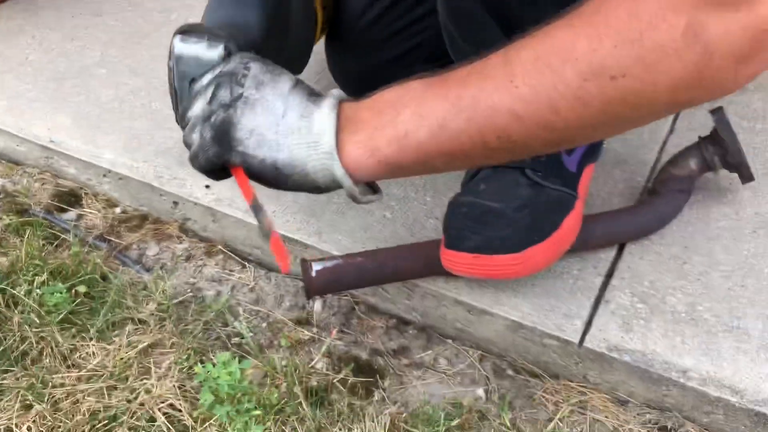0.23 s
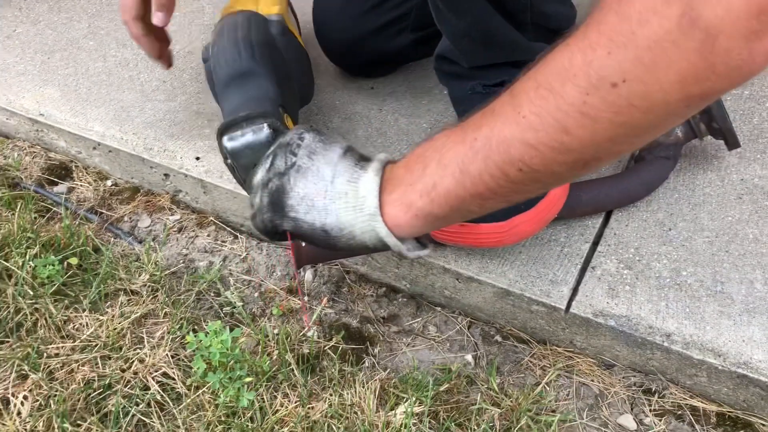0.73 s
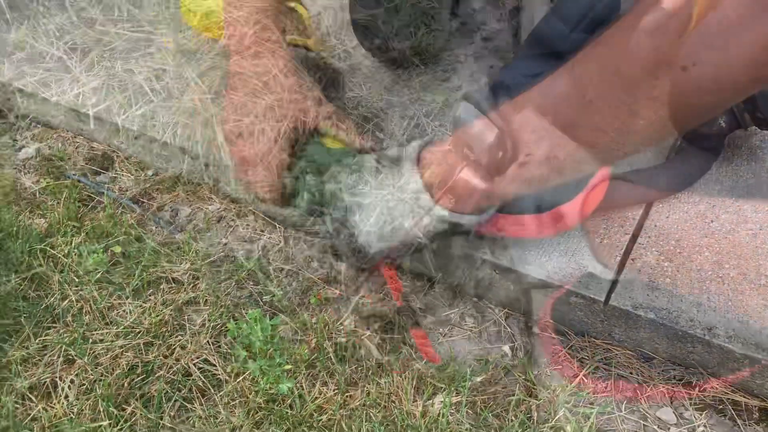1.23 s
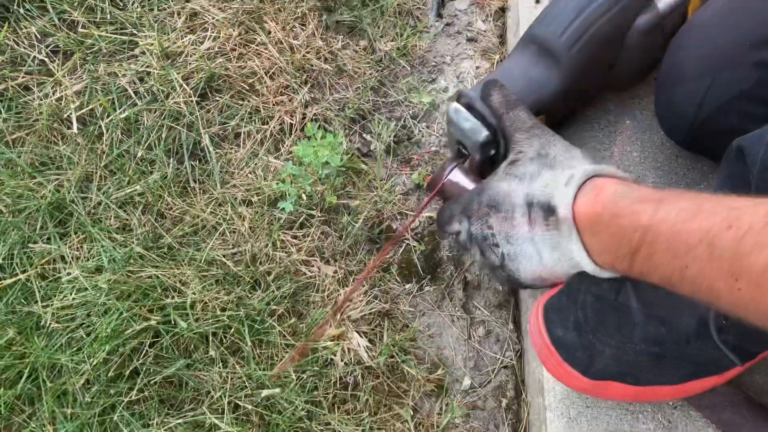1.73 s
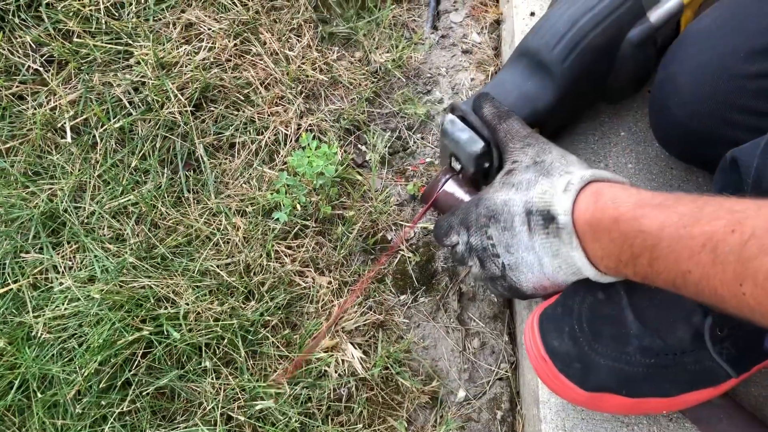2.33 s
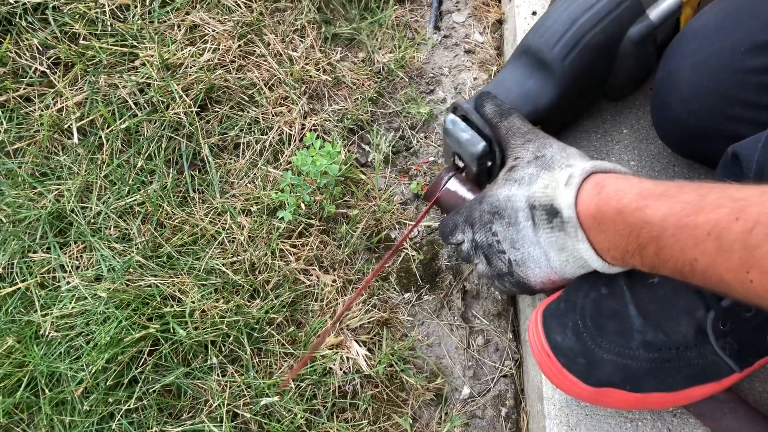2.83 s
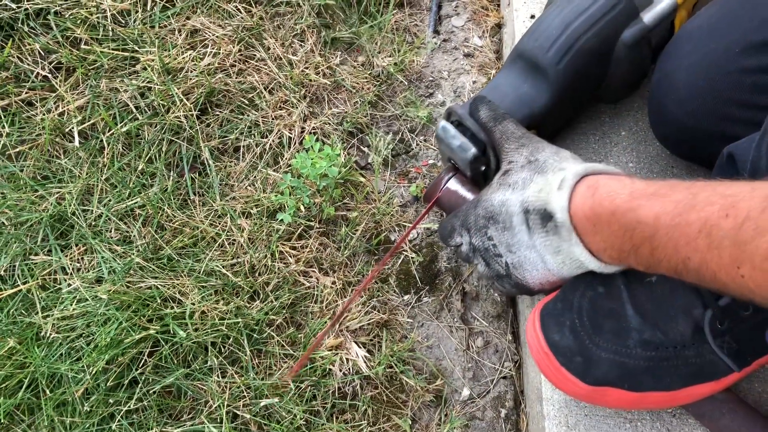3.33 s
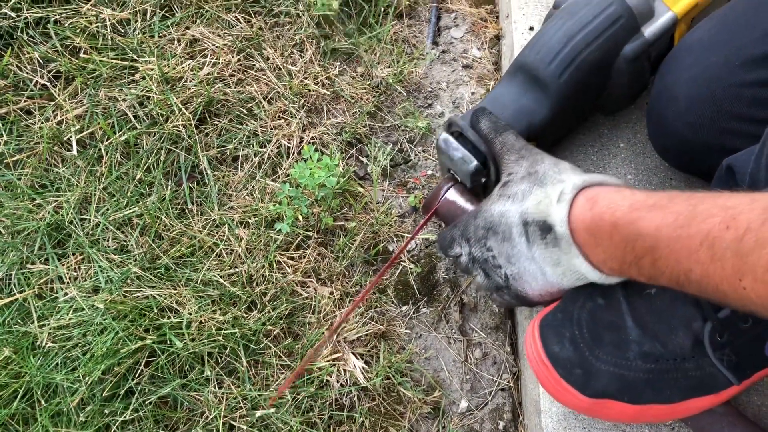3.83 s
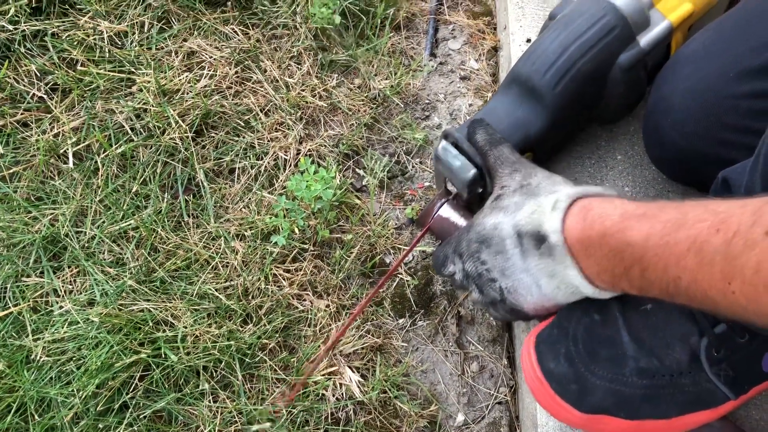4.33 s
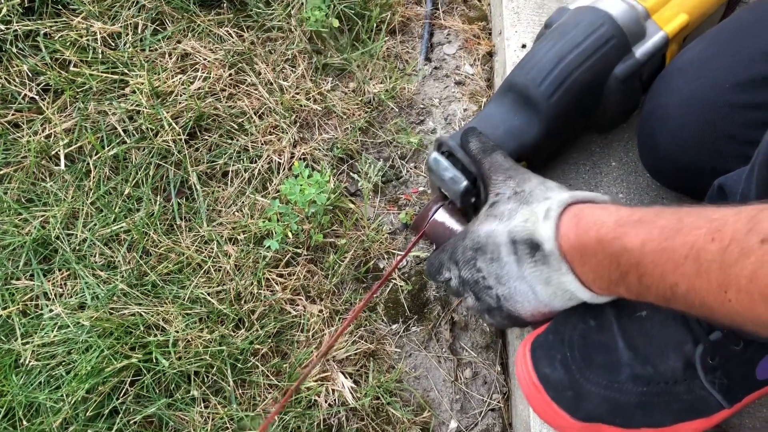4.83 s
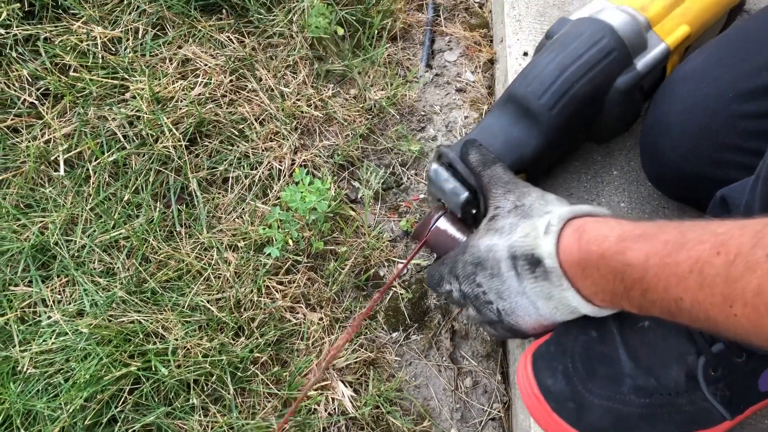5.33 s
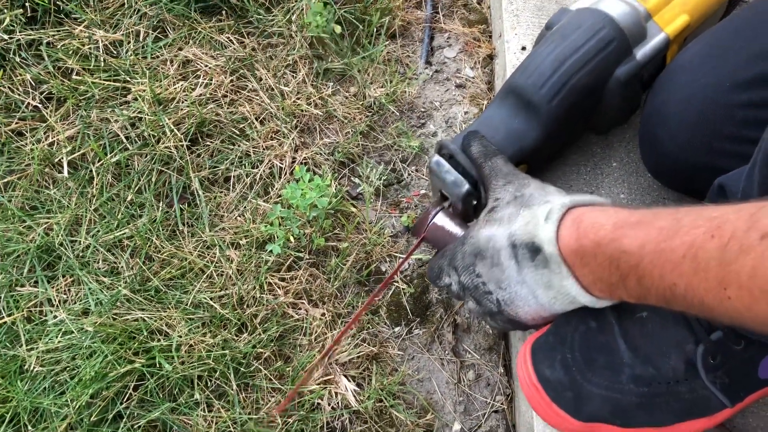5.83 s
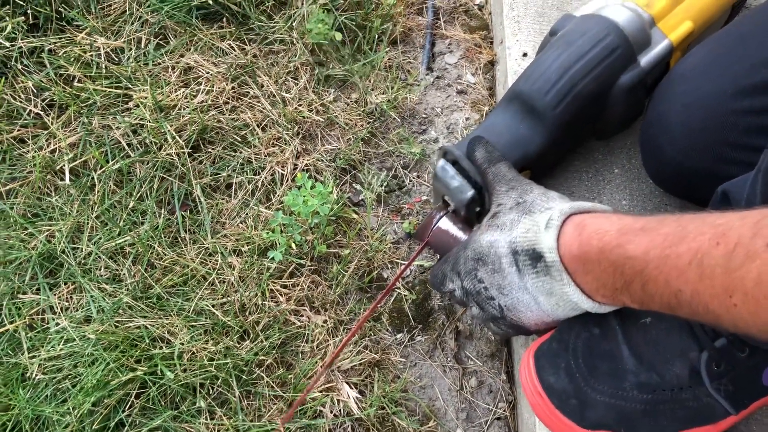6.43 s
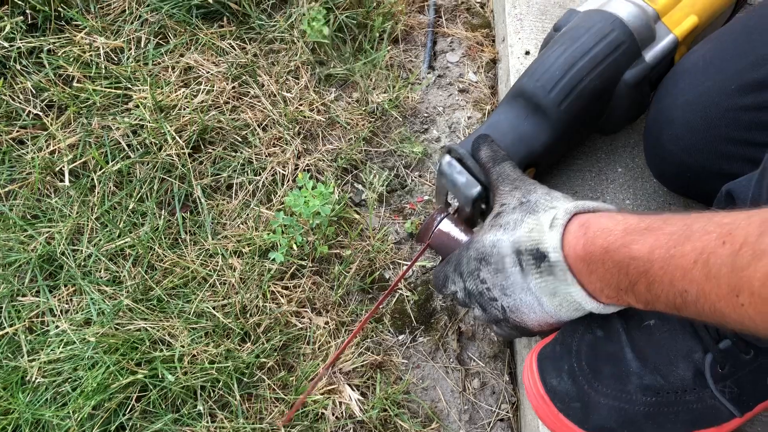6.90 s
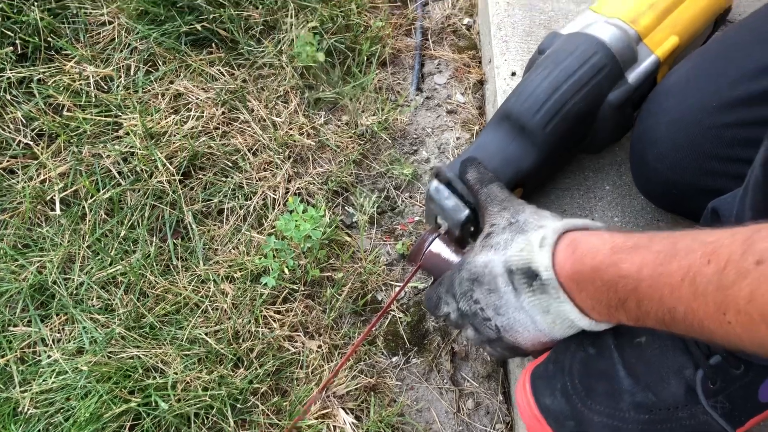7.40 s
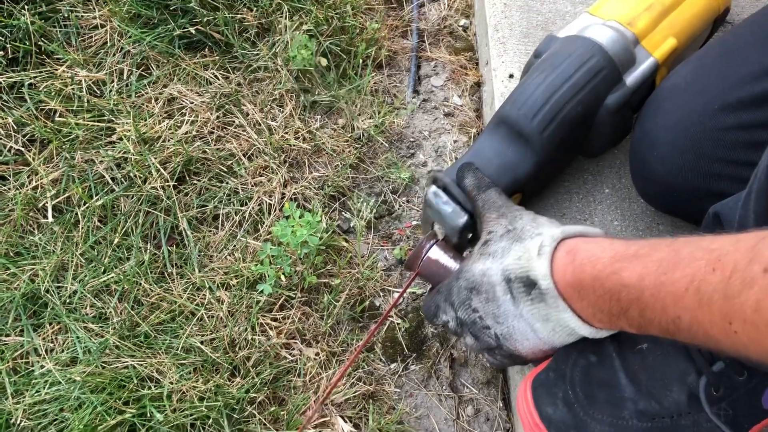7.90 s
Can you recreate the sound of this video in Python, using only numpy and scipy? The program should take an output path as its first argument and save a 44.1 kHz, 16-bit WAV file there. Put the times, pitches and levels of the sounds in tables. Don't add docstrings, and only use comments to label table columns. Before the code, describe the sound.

Outdoors at a kerb, faint air, small wind bumps on the microphone, glove rustles, light knocks and two distant bird chirps fill the first second. Harder knocks follow as a power saw fades in, reaching full level near two seconds. It then cuts steel pipe continuously, close and dry: rapid rasping chatter, low motor hum, metallic ringing and a piercing high whine that wavers with load, still running at the end.

```python
import sys
import numpy as np
from scipy import signal
from scipy.fft import rfft, irfft, next_fast_len
from scipy.io import wavfile
from scipy.ndimage import uniform_filter1d

SR = 44100
rng = np.random.default_rng(int(sys.argv[2]) if len(sys.argv) > 2 else 0)


def dump_mix(stems):
    frames = np.atleast_2d(stems).T
    limited = np.clip(frames, -1, 1)
    pcm = np.round(limited * 32767).astype(np.int16)
    wavfile.write(sys.argv[1], SR, pcm)


def magnitude_from_level(level_db):
    exponent = np.asarray(level_db, float) / 20
    return 10 ** exponent


N = 359856
WHINE_PER_TURN = 174


def evened(x):
    return x / np.sqrt(np.mean(x ** 2) + 1e-20)


def curves(rows):
    s, *columns = np.transpose(rows)
    return [np.interp(np.arange(N) / SR, s, c) for c in columns]


def spells(rows, ramp_s):
    t = np.arange(0, N + 32, 32) / SR
    coarse = 0 * t
    for start, length, height in rows:
        inside_s = np.minimum(t - start, start + length - t)
        coarse = coarse + height * np.clip(inside_s / ramp_s + 1, 0, 1)
    return np.interp(np.arange(N) / SR, t, coarse)


def drift(rate_hz, size=N):
    coarse = rng.standard_normal(N // 64 + 2)
    smooth = evened(signal.lfilter(*signal.butter(2, min(128 * rate_hz / SR, .9)), coarse))
    return np.interp(np.linspace(0, N / 64, size), np.arange(len(smooth)), smooth)


def colour(x, points):
    f, db = np.transpose(points)
    size = next_fast_len(N)
    hz = np.fft.rfftfreq(size, 1 / SR)
    gain = magnitude_from_level(np.interp(np.log(hz + 1), np.log(f + 1), db))
    return evened(irfft(rfft(x, size) * gain, size)[:N])


def ring(x, hz, width_hz):
    return evened(signal.lfilter(*signal.iirpeak(hz, hz / width_hz, SR), x))


def resonate(x, hz, width_hz):
    turn = np.exp(2j * np.pi * np.cumsum(hz * np.ones(len(x))) / SR)
    r = np.exp(-np.pi * width_hz / SR)
    return 2 * (turn * signal.lfilter([1 - r], [1, -r], x * turn.conj())).real


def blows(turns, place, length, spread_db, jitter, round_by=1):
    draw = rng.standard_normal((int(turns[-1]) + 3, 2))
    late = turns - place + 1
    whole = late.astype(int)
    since = late % 1 - jitter * (2.09 + np.clip(draw[whole, 0], -1.5, 1.5))
    since = np.where(since < 0, since + 1, since) / length
    return magnitude_from_level(spread_db * draw[whole, 1]) * (since * np.exp(1 - since)) ** round_by


# (frequency [Hz], level per Hz [dB])
AIR_SPECTRUM = [(180, -21), (300, -14), (336, -30), (396, -21.5), (1570, -27), (2070, -29), (2520, -33),
                (4690, -34.5), (10600, -45), (15000, -40)]


def air():
    return magnitude_from_level(-58 - 2.5) * colour(rng.standard_normal(N), [(20, -30.0), *AIR_SPECTRUM])


# (time [s], length [s], level [dB])
GUSTS = [(.41, 0.019, 13.5), (.47, 0.045, 3), (.525, .01, -6), (.555, 0.038, 10), (.635, 0.034, 12),
         (.79, 0.062, 9.5), (.895, .025, -3), (.99, 0.091, 10.5), (1.15, .3, -10), (1.5, .05, 2)]


def wind():
    lumps = ring(ring(ring(rng.standard_normal(N), 125.0, 150.0), 85., 200.0), 85., 330.0)
    return magnitude_from_level(-53 + spells(GUSTS, 0.0094) + 2. * drift(23.0)) * lumps


# (time [s], length [s], level [dB], frequency [Hz])
RUSTLES = [
    (0.345, 0.16, 17, 4200),
    (0.57, 0.014, 6, 4100),
    (.67, 0.068, 16, 2000),
    (0.25, 0.11, 3, 5900),
    (0.735, 0.005, 21, 4700),
]


def rustle():
    out = np.zeros(N)
    grit = (rng.standard_normal(N) * magnitude_from_level(1.8 * drift(150.)))[:SR]
    for start, length, db, hz in RUSTLES:
        folds = evened(resonate(grit, hz, 760.0) + 0.53 * resonate(grit, 1.4 * hz, 1000.) + 0.1 * grit)
        swell = spells([(start, length, 1)], 0.026 + 0.43 * length)[:SR] ** 2
        out[:SR] += magnitude_from_level(-76.5 + 1.5 + db) * swell * folds
    return out


def outdoors():
    fade = np.clip((1.75 - np.arange(N) / SR) / 0.36, 0, 1)
    return (air() + wind() + rustle()) * fade


# (time [s], length [s], top frequency [Hz], level [dB])
CHIRPS = [
    (.185, .115, 3480, -70),
    (.605, .12, 3500, -69),
]


def bird():
    rise_s, scoop_hz, sag_hz_per_s = .02, 1200, 5500
    out = np.zeros(N)
    for s, length, top_hz, db in CHIRPS:
        t = np.arange(0, length, 1 / SR)
        hz = top_hz + 400 - scoop_hz * np.exp(-t / rise_s) - sag_hz_per_s * t
        fuzz = evened(resonate(resonate(rng.standard_normal(len(hz)), hz, 170.), hz, 330.))
        out[round(s * SR):][:len(t)] += magnitude_from_level(db + 7.0) * fuzz * signal.windows.tukey(len(hz), .5)
    return out


# (time [s], peak level [dB], ring frequency [Hz], dull part relative level [dB], length [s])
KNOCKS = [(0.047, -62, 950, 19, 0.02), (0.166, -34, 3000, -20, 0.0067), (0.37, -38, 3000, -20, 0.007),
          (0.45, -34, 7890, -14, 0.011), (0.558, -29, 2380, -8, 0.01), (0.563, -18, 8050, -8.5, 0.013),
          (0.724, -36, 4600, -18, 0.014), (0.995, -24, 985, -9, 0.051), (1.043, -12, 1900, -1.5, 0.012),
          (1.342, -10, 3500, -8, .005), (1.354, -10, 2500, -11, .005), (1.413, -8, 3000, -11, 0.0049),
          (1.588, -11, 4500, -17, .005)]
# (frequency [Hz], level [dB], 60 dB decay [s])
HOUSING = [(545, -11, .05), (1110, 0, .035), (1850, -9, .02)]


def handling():
    out, t = np.zeros(N), np.arange(3000) / SR
    for s, db, hz, dull_db, length in KNOCKS:
        fall = np.minimum(t / 0.0033, 1) * magnitude_from_level(-25 * t / max(length, .002))
        noise = rng.standard_normal(len(t))
        width_hz = 160. if hz > 7000 else 0.65 * hz
        crack = 0.17 * ring(noise, 3600.0, 7000.) + 0.38 * ring(noise, hz, width_hz)
        thud = magnitude_from_level(dull_db) * (0.3 * ring(noise, 1100.0, 730.0) + 0.1 * ring(noise, 520.0, 430.0))
        hollow = np.zeros(len(t))
        for f, mode_db, t60 in HOUSING:
            hollow += magnitude_from_level(mode_db - 60 * t / t60) * np.sin(2 * np.pi * f * rng.uniform(.94, 1.06) * t)
        hollow *= magnitude_from_level(dull_db - 4.5) * np.minimum(t / 0.0014, 1)
        out[round(s * SR):][:len(t)] += magnitude_from_level(db) * (fall * (crack + 1.5 * thud) + hollow)
    return out


# (time [s], hum relative level [dB])
GRIPS = [(0.9, -18.5), (1.72, -13.5), (3.0, -13), (3.76, -14.5), (5.18, -15), (5.72, -14.5), (6.12, -15),
         (6.9, -16), (7.4, -15), (7.8, -13.5)]
ORDERS_DB = [-25.5, -21, -13.5, -12, -7, -10, -9.5, -9.5, -6.5, -5.5, -6, -16, -17, -9, -1.5, -6, -7, -2.5]
FAVOURED = [(5, 9, 10, 13, 15, 16), (2, 3, 4, 5, 6, 8, 9, 10, 12), (3, 4, 5, 8, 9, 10, 13, 14),
            (3, 4, 9, 11, 14, 15), (3, 6, 10, 14, 15, 16), (6, 11, 15), (2, 5, 11, 14, 15, 17),
            (2, 3, 4, 5, 6, 10, 12, 13, 18), (3, 6, 10, 17, 18), (3, 6, 9, 10, 13, 15, 17)]
MUFFLED = [(7, 8), (7, 16), (), (8,), (), (8, 10, 14, 16, 17), (4, 8, 10, 16), (17,), (7, 8, 9), (8,)]


def hum(turns, level_db):
    favour_db, muffle_db = 6, -8
    turns, t = turns[::4], np.arange(0, N, 4) / SR
    size = len(t)
    edges = [1] + [np.clip((t - row[0]) / 0.037, 0, 1) for row in GRIPS[1:]] + [0]
    held = [edges[g] - edges[g + 1] for g in range(len(GRIPS))]
    out = np.zeros(size)
    for k, db in enumerate(ORDERS_DB, 1):
        gain = 0
        for h, up, down in zip(held, FAVOURED, MUFFLED):
            gain = gain + h * magnitude_from_level(db + favour_db * (k in up) + muffle_db * (k in down))
        phase = 2 * np.pi * (k * turns + rng.random()) + 0.028 * k * drift(16.0, size=size)
        waver_db = 1.4 * drift(7., size=size) + 1.1 * drift(1., size=size)
        out += gain * magnitude_from_level(waver_db) * np.sin(phase)
    grip_gain = sum(h * magnitude_from_level(row[1]) for h, row in zip(held, GRIPS))
    out *= grip_gain / np.sqrt(uniform_filter1d(out ** 2, size=SR // 8) + 1e-12)
    out += magnitude_from_level(-27.5) * np.sin(2 * np.pi * 7.58 * turns + 0.4 * drift(12.0, size=size))
    return magnitude_from_level(level_db - 1.5) * signal.resample_poly(out, 4, 1)[:N]


# (time [s], length [s], level [dB])
PIPE_SWELLS = [(2.2, 0.89, 4.5), (3.2, 0.33, 4), (4.2, 0.44, 8), (4.7, 0.35, 6.5), (5.15, 1, 4),
               (6.7, 0.1, 9)]
# (time [s], frequency [Hz])
PIPE_PITCH = [(1.9, 7180), (3.0, 6950), (3.7, 6800), (4.0, 7150), (5.0, 7050), (6.1, 7150), (6.7, 7000)]


def pipe_wall(rub):
    pipe_hz = curves(PIPE_PITCH)[0]
    pipe = evened(resonate(resonate(rub, pipe_hz, 220.0), pipe_hz, 400.))
    return magnitude_from_level(-27 + spells(PIPE_SWELLS, 0.067) - 5.5) * pipe


# (from time [s], to time [s], from frequency [Hz], to frequency [Hz], level [dB])
SQUEALS = [
    (.92, 1.8, 11800, 10600, -29),
    (2.85, 4.0, 10500, 9500, -29),
    (3.15, 3.7, 7850, 7450, -31),
]
SQUEAL_SINK = [2.2, .6, .3]


def squeals(rub):
    out = np.zeros(N)
    for (start, stop, from_hz, to_hz, db), sink in zip(SQUEALS, SQUEAL_SINK):
        span = slice(round(start * SR), round(stop * SR))
        u = np.linspace(0, 1, span.stop - span.start)
        hz = from_hz + (to_hz - from_hz) * np.expm1(-sink * u) / np.expm1(-sink)
        squeal = evened(resonate(resonate(rub[span], hz, 260.), hz, 400.))
        out[span] += magnitude_from_level(db) * signal.windows.tukey(len(u), .4) * squeal
    return out


# (time [s], length [s], level [dB])
BLADE_SWELLS = [(1.3, 0.23, 5.5), (2.6, 0.22, 3), (3.0, 0.4, 7), (3.55, .3, 2), (4.65, 0.19, 4),
                (5.25, 0.32, 5.5), (5.75, 0.29, 3.5)]
# (time [s], frequency [Hz])
BLADE_PITCH = [(.9, 11800), (1.3, 11100), (1.7, 10600), (2.4, 10600), (2.55, 11050), (3.1, 10700),
               (3.6, 10450), (4.6, 10500), (5.2, 10800), (6.0, 10700)]
# (time [s], length [s], share [0-1])
ONE_SIDED = [
    (2.6, 1.0, .8),
    (4.45, 0.18, 0.4),
    (5.1, 0.87, .9),
]


def blade(turns):
    damped = [(6.06, N / SR, -10)]
    level_db = -19 + spells(BLADE_SWELLS, 0.16) + spells(damped, 0.031)
    other = np.clip(.85 - spells(ONE_SIDED, 0.067), 0, 1)
    hz = curves(BLADE_PITCH)[0]
    taps = blows(turns, .22, .033, 1.8, .012) + other * blows(turns, .7, .06, 2.5, .015)
    scrape = (.1 + .2 * other + taps) * rng.standard_normal(N)
    ping = 2.2 * (1 - other) * taps * np.sin(2 * np.pi * np.cumsum(hz + 150 * drift(40.)) / SR) / 4
    singing = evened(resonate(resonate(scrape + ping, hz, 900.0), hz, 1000.0))
    return magnitude_from_level(level_db - 10.0) * singing


def rings(turns):
    rub = (.5 + blows(2 * turns, 0.07, 0.17, 3.9, 0.013)) * rng.standard_normal(N)
    return blade(turns) + pipe_wall(rub) + squeals(rub)


def teeth(turns, lasts):
    patterns = rng.standard_normal((N // 1500, 530))
    place = (turns % 1 * 530).astype(int)
    age = turns / max(lasts, 3)
    angle = np.pi / 2 * (age % 1)
    old, new = patterns[age.astype(int), place], patterns[age.astype(int) + 1, place]
    return np.cos(angle) * old + np.sin(angle) * new


BODY_HZ = [1245, 2280, 2720, 3560, 4480, 5260, 5900, 6250, 8050, 8700, 12100]
# (width [Hz], level [dB])
BODY = [(98, -27), (410, 10.5), (450, 9), (425, 7.5), (160, 3), (298, 4.5), (300, 2), (250, -1), (500, 5.5),
        (300, -4.5), (800, 10)]
# (time [s], length [s], level [dB])
SWELLS = [(1.2, 0.54, 6), (5.22, 0.43, 7.5), (2.0, 3.6, -14), (1.7, 0.98, 1), (3.8, 1.1, 3.5),
          (1.7, 0.6014, 4), (3.5, 1.0, 0.5), (7.6, 0.63, 3), (2.8, .5, 1.5), (6.5, 1.806, -6),
          (3.05, 1.32, 5.5), (3.9, 0.5995, 4)]
SWELLING = [0, 0, 0, 1, 1, 2, 2, 2, 3, 4, 5, 7]


def body_modes(scrape):
    out = np.zeros(N)
    for k, (hz, (width_hz, db)) in enumerate(zip(BODY_HZ, BODY)):
        swell_db = spells([row for mode, row in zip(SWELLING, SWELLS) if mode == k], 0.044)
        out += magnitude_from_level(db + swell_db + 1.0 * drift(1.0)) * ring(scrape, hz, width_hz)
    return out


# (frequency [Hz], width [Hz], level [dB])
CLACK = [(1235, 112, -1), (2200, 1600, -2), (4000, 100, -6), (6160, 960, 2), (490, 880, -8.5)]


def pipe_end(turns, slam):
    blow = blows(turns, .03, 0.016, 1., 0.01, round_by=2)
    strike = 0.63 * evened(np.diff(blow, prepend=0)) + 0.78 * evened(slam * rng.standard_normal(N))
    return sum(magnitude_from_level(db) * ring(strike, hz, width_hz) for hz, width_hz, db in CLACK)


# (place [turns], level [dB])
GEAR_BLOWS = [(.0, 12.5), (.24, 8.5), (.5, 12.5), (.76, 10)]
# (time [s], length [s], share of hard blows [0-1])
RATTLES = [(1.1, 0.25, 0.19), (1.1, 0.57, 0.46), (1.75, .3, 0), (3.85, 0.48, 0.03), (5.2, 0.42, 0.44)]
# (time [s], length [s], share [-])
REBOUND = [
    (1.27, 0.37, 0.16),
    (1.75, 0.46, 0.38),
    (3.8, 1.1, 0.29),
]
# (frequency [Hz], level per Hz [dB])
GRIND = [(16, -85), (35, -85), (76, -25), (198, -25.5), (367, -13.5), (698, -12), (1260, -4.5),
         (1760, -7.5), (2590, -3.5), (4220, -4.5), (7000, -1), (9800, -3.5), (11400, -10.5), (15700, -3.5)]


def grinding(turns, level_db, clack_db, bright_db):
    hard = np.clip(0.11 + spells(RATTLES, 0.05), 0, 1)
    gears = sum(magnitude_from_level(db) * blows(turns, place, 0.031, 0.93, 0.032) for place, db in GEAR_BLOWS)
    slam = blows(turns, -.06, 0.19, 1.4, 0.01, round_by=2.5)
    slam = slam + spells(REBOUND, .05) * blows(turns, .45, .08, 3.5, .02)
    push = 0.99 * (1 - .75 * hard) + (1 - hard) * 0.34 * gears + hard * 1.83 * slam
    chips = magnitude_from_level(0.45 * np.minimum(rng.exponential(1, N), 5)) * (rng.random(N) < 2500 / SR)
    chips = chips * rng.choice([-1, 1], N)
    rough = 0.93 * rng.standard_normal(N) + 0.59 * teeth(turns, lasts=7.) + 0.37 * evened(chips)
    scrape = push * rough * magnitude_from_level(0.5 * drift(36.0))
    scrape /= np.sqrt(uniform_filter1d(scrape ** 2, size=SR // 6))
    sound = colour(scrape + .5 * evened(body_modes(scrape)), GRIND)
    treble = signal.lfilter(*signal.butter(2, 5000 / SR * 2, "high"), sound)
    calm = (push / np.sqrt(uniform_filter1d(push ** 2, size=SR // 20))) ** -.42
    brighter = (magnitude_from_level(bright_db) * calm - 1) * treble
    clack = 1.0 * hard * magnitude_from_level(clack_db) * pipe_end(turns, slam)
    return magnitude_from_level(level_db + 1.08) * (sound + brighter + clack)


# (time [s], length [s], share [0-1])
BREAK = [
    (7.787, .022, 1),
]


def whine(turns, level_db):
    broken = spells(BREAK, .005)
    phase = 2 * np.pi * turns * WHINE_PER_TURN
    phase = phase + (0.15 + 1.6 * broken) * drift(250.) + 1.4 * drift(10.3)
    angle = 2 * np.pi * turns
    wobble = .1 * np.cos(angle) + .15 * np.cos(2 * angle + .8) + .1 * np.cos(3 * angle)
    flutter_db = 0.9 * drift(31.0) + 0.7 * drift(90.) + .5 * drift(280.) - 5 * broken
    return np.sqrt(2) * magnitude_from_level(level_db + flutter_db) * (1 + wobble) * np.sin(phase + 0.65 * wobble)


# (time [s], whine frequency [Hz])
SPEED = [(0.93, 13610), (1.5, 14120), (1.9, 14650), (2.07, 14730), (2.88, 15440), (3.26, 15050),
         (3.77, 15010), (4.38, 14270), (4.83, 14660), (5.0, 14370), (5.58, 13740), (5.84, 14640),
         (6.83, 14530), (7.03, 13940), (7.23, 13990), (7.62, 13230), (7.9, 14650), (8.16, 14680)]
# (time [s], length [s], whine shift [Hz])
WHINE_SHIFTS = [(.93, 0.02, 50), (1.0, .02, -20), (1.085, .02, -140), (1.46, .03, -115), (1.7, .08, -30),
                (1.58, .14, -75), (1.8, .03, -15), (1.9, .2, -75), (2.2, .02, 60), (2.3, .2, 40), (2.6, .2, 25),
                (3.2, .1, 25), (3.6, .1, 45), (4.0, .1, -45), (4.3, .1, -55), (4.4, .02, -40), (5.0, .01, -45),
                (5.12, .3, 45), (5.55, .17, -61), (5.96, .06, -60), (6.2, .1, 55), (6.9, .01, 40),
                (7.02, .06, -55), (7.42, .12, -100)]
# (frequency [Hz], level [dB])
SHELL = [(13250, -17), (13800, -17.5), (14200, -15.5), (14600, -14), (14900, -16), (15100, -17),
         (15400, -18)]
# (time [s], length [s], level [dB])
WHINE_SWELLS = [(.95, .17, 2), (1.3, 0.33, -3.5), (2.2, 0.23, -1.5), (3.6, 0.22, 1), (4.75, .12, -1),
                (5.28, .3, -1), (6.4, 0.54, 0.3), (7.74, 0.04, -1.5)]
# (time [s], grinding level [dB])
FEED = [(0.9, -16), (1.9, -17.5), (3.4, -17), (3.8, -18.5), (4.3, -18), (4.9, -17.5), (5.8, -18),
        (7.1, -19.5), (8.16, -18)]
# (time [s], length [s], level [dB])
SHALLOW = [
    (.9, 0.28, -1.5),
]
# (time [s], length [s], level [dB])
CLACK_SWELLS = [
    (1.45, 0.37, 2),
    (5.25, 0.29, -0.5),
    (7.35, 0.31, 11),
]


def saw():
    whine_hz = uniform_filter1d(curves(SPEED)[0], size=round(.06 * SR))
    whine_hz = whine_hz + spells(WHINE_SHIFTS, .06) + 5 * drift(4.)
    whine_db = np.interp(whine_hz, *np.transpose(SHELL)) + spells(WHINE_SWELLS, 0.038)
    level_db, shallow_db = curves(FEED)[0], spells(SHALLOW, 0.16)
    clack_db, bright_db = -9 + shallow_db + spells(CLACK_SWELLS, 0.15), 1.5 + shallow_db
    fade_from_s, fade_to_s = .917, 1.86
    fade = np.clip((np.arange(N) / SR - fade_from_s) / (fade_to_s - fade_from_s), 0, 1)
    turns = np.cumsum(whine_hz) / SR / WHINE_PER_TURN + .58
    cut = hum(turns, level_db) + rings(turns) + grinding(turns, level_db, clack_db, bright_db)
    return fade ** 1.33 * whine(turns, whine_db) + fade * cut


def scene():
    return np.tile(outdoors() + bird() + handling() + saw(), (2, 1))


def patchy_top(x):
    reach_hz, depth_db, shelf_hz, edge_hz = 900, 31., 15480, 15740
    hz, t, z = signal.stft(x, SR, nperseg=2048, noverlap=1536)
    row_hz = hz[:, None]
    power = abs(z) ** 2 + 1e-20
    top = power * (row_hz > 13000)
    peak_hz = hz[top.argmax(0)]
    smooth = uniform_filter1d(uniform_filter1d(power, size=13, axis=0), size=7, axis=1)
    under_db = 10 * np.log10(top.max(0) / smooth)
    patches = rng.standard_normal((t.size // 5 + 1, 129)).T
    patches = np.repeat(np.repeat(patches, 8, axis=0), 5, axis=1)[:hz.size, :t.size]
    above = (row_hz > peak_hz) & (row_hz < shelf_hz)
    limit_db = depth_db + np.where(row_hz < shelf_hz, 1.4, .3) * patches
    limit_db = limit_db - 4.5 * above + .5 * (row_hz < peak_hz) - .9 * (row_hz >= shelf_hz)
    keep = (under_db < limit_db) | (row_hz < peak_hz - reach_hz)
    keep &= row_hz < edge_hz
    return signal.istft(z * keep, SR, nperseg=2048, noverlap=1536)[1][:N]


def band_limit(x):
    return signal.sosfilt(signal.butter(12, 16580, fs=SR, output="sos"), x)


def record(dry):
    cut = signal.lfilter(*signal.butter(5, 42 / SR * 2, "high"), dry[0])
    capsule = patchy_top(1.452 * np.tanh(cut / 1.498))
    return band_limit(np.tile(capsule, (2, 1)))


dry = scene()
out = record(dry)
dump_mix(out)
```